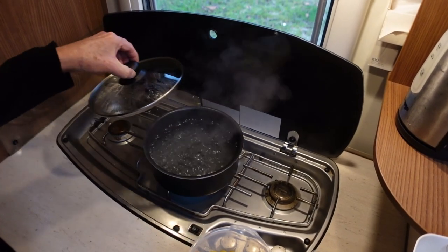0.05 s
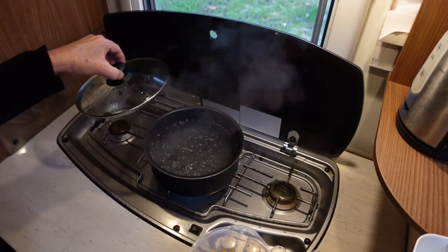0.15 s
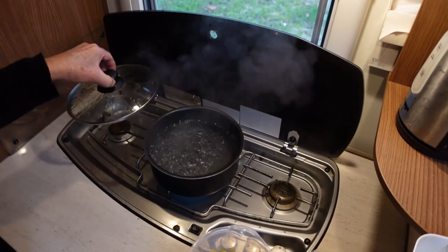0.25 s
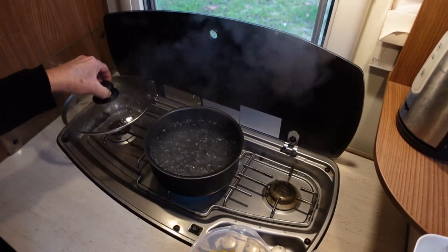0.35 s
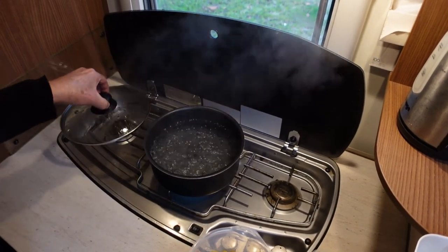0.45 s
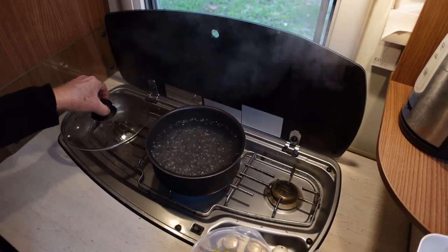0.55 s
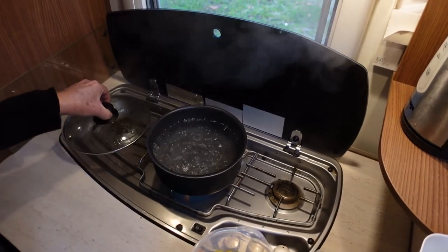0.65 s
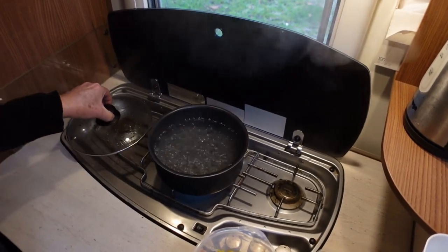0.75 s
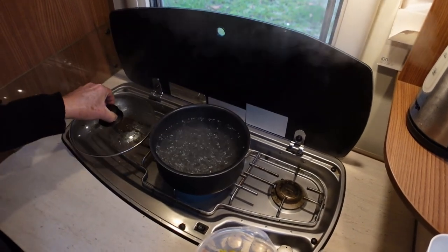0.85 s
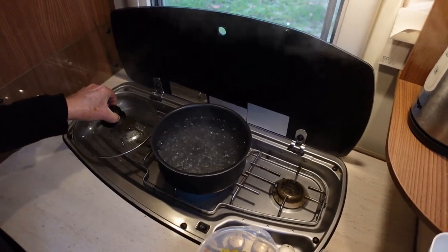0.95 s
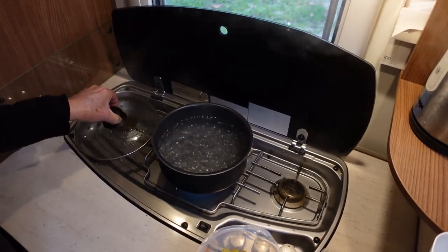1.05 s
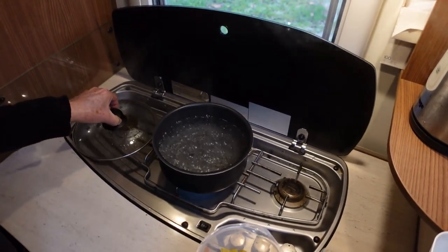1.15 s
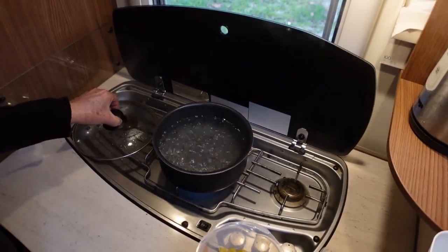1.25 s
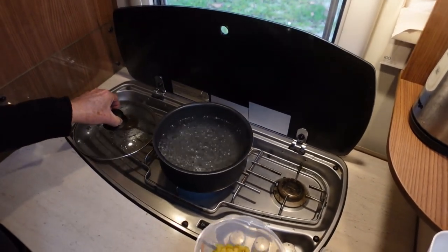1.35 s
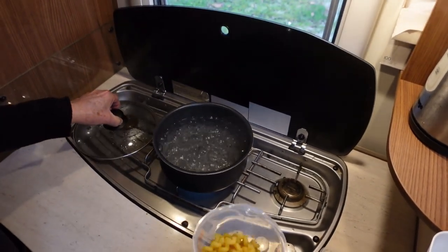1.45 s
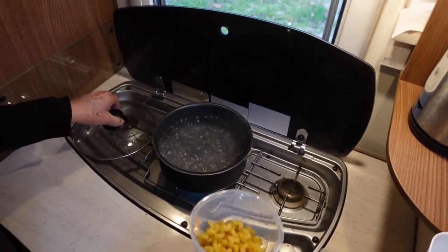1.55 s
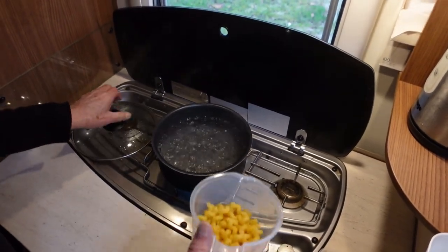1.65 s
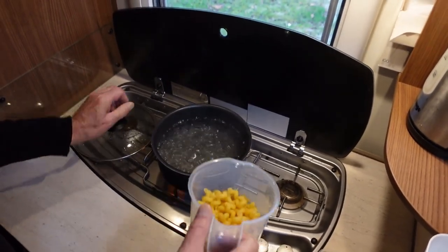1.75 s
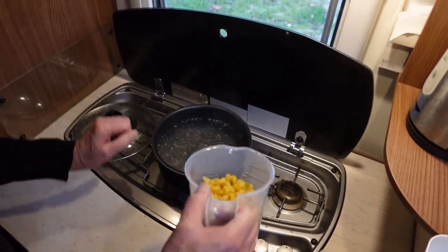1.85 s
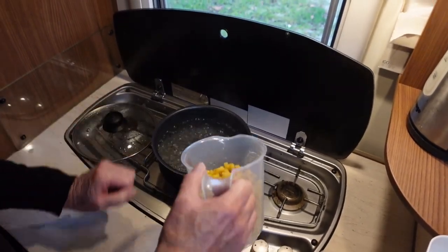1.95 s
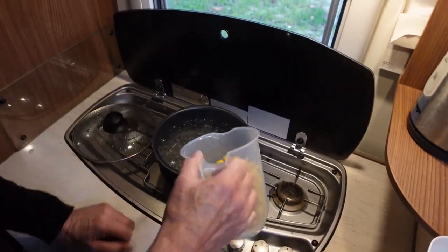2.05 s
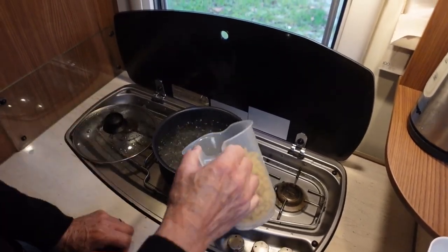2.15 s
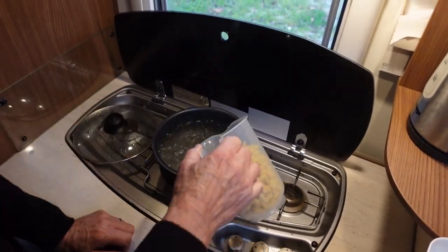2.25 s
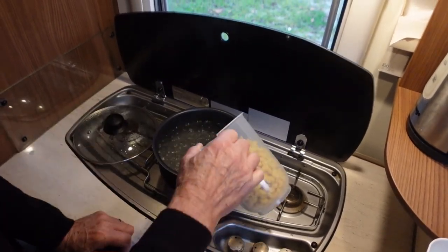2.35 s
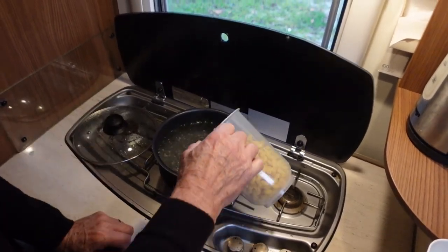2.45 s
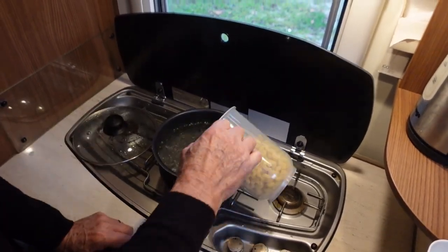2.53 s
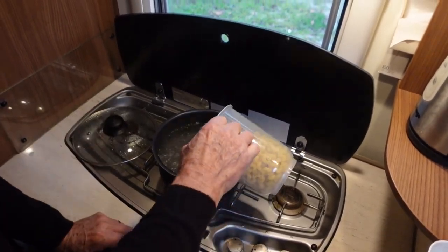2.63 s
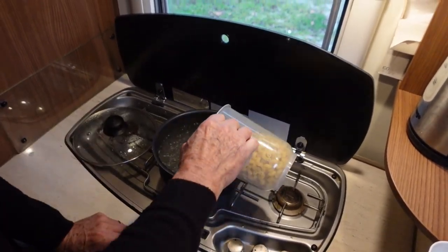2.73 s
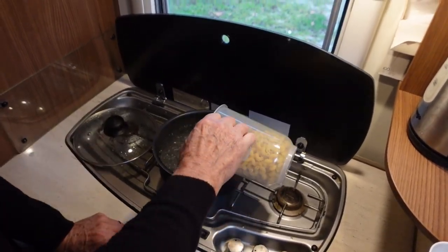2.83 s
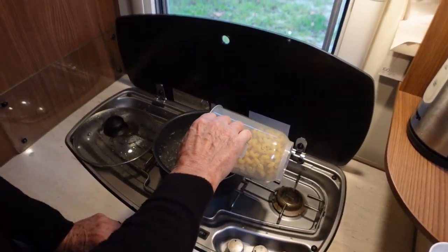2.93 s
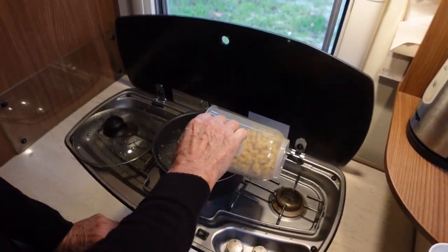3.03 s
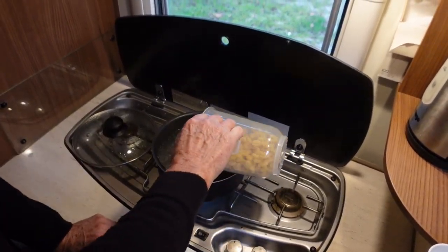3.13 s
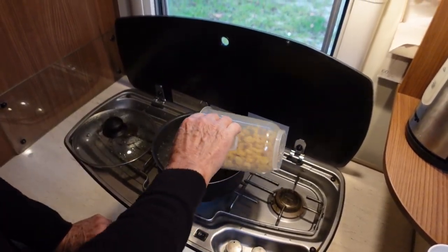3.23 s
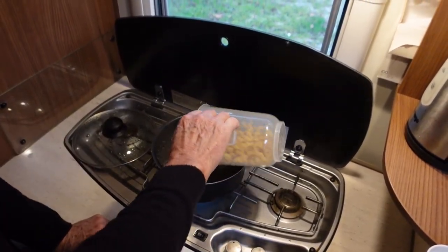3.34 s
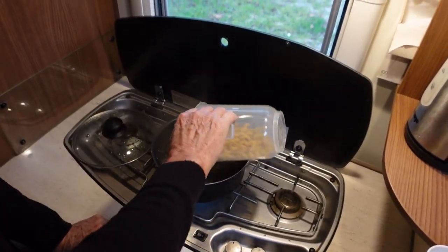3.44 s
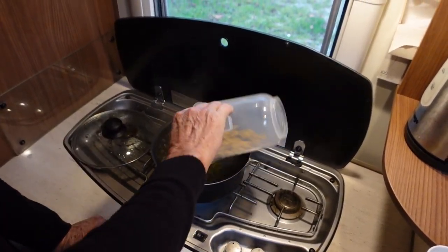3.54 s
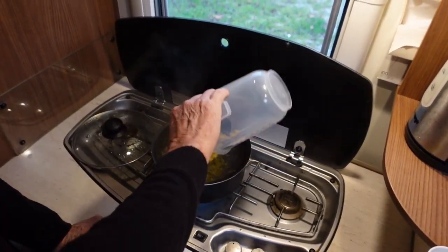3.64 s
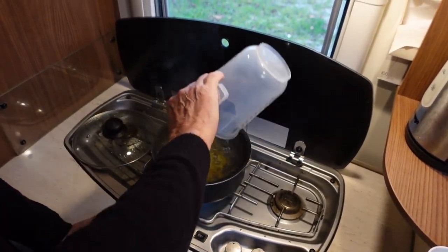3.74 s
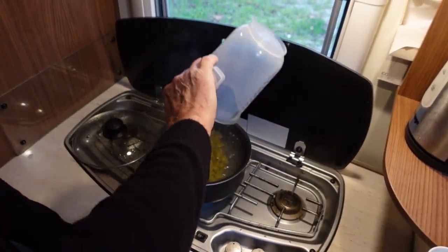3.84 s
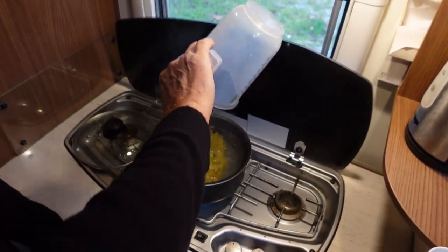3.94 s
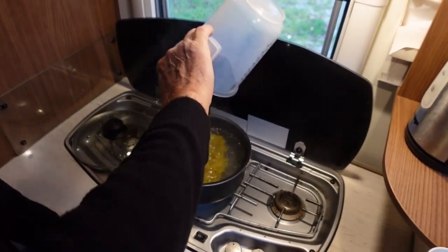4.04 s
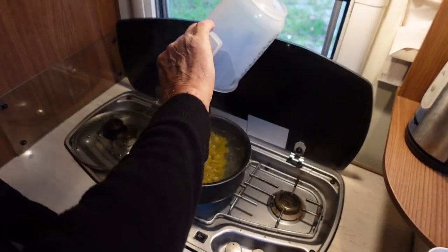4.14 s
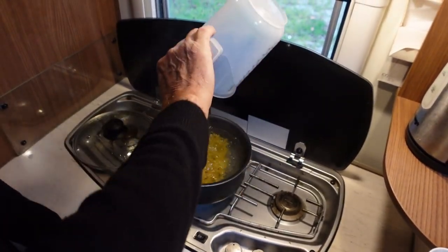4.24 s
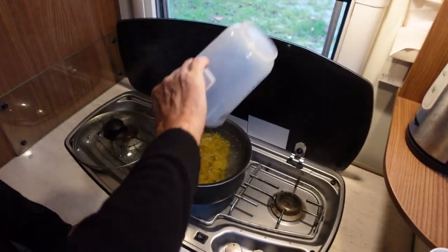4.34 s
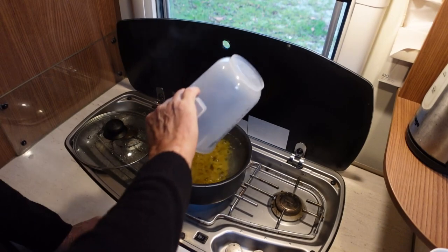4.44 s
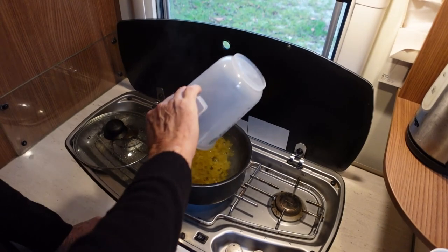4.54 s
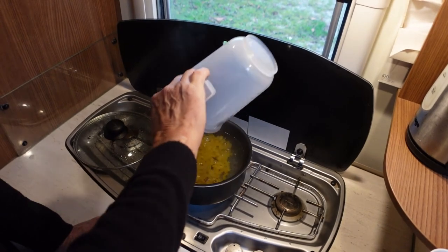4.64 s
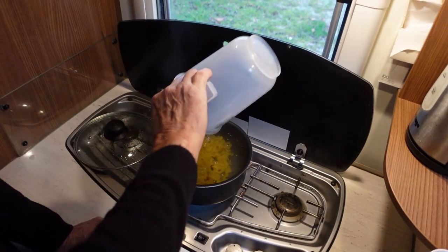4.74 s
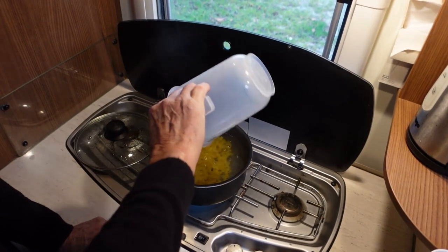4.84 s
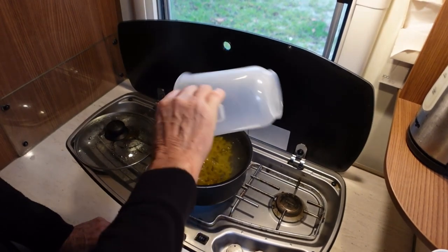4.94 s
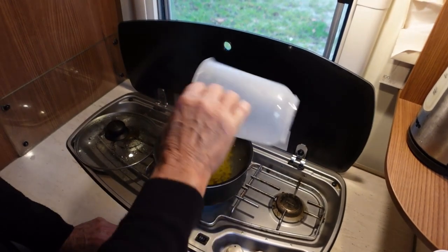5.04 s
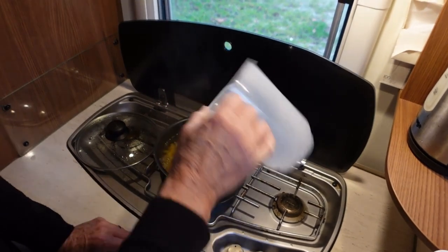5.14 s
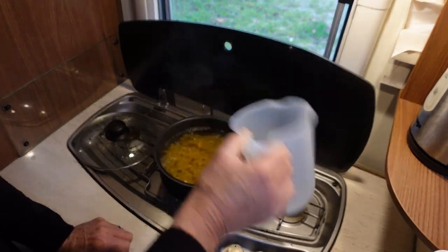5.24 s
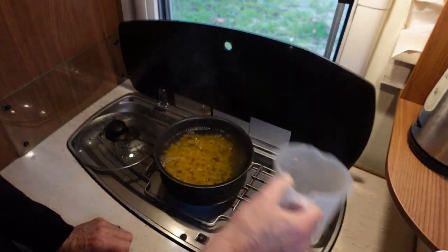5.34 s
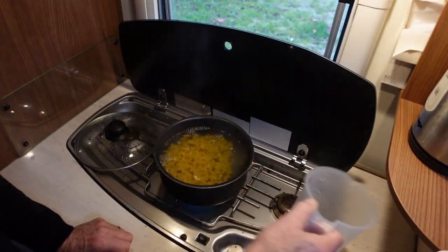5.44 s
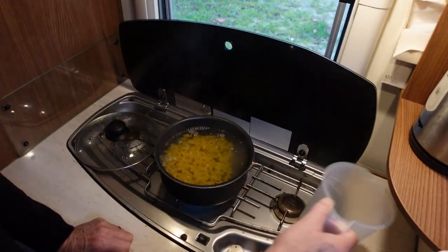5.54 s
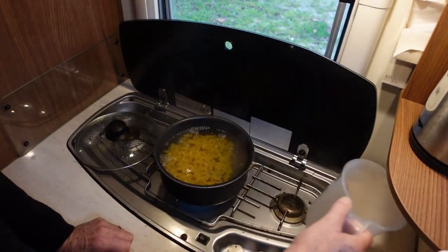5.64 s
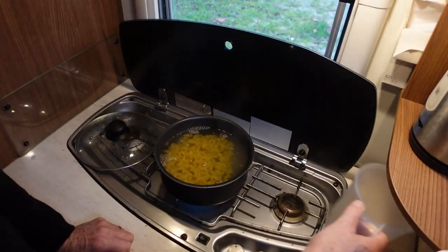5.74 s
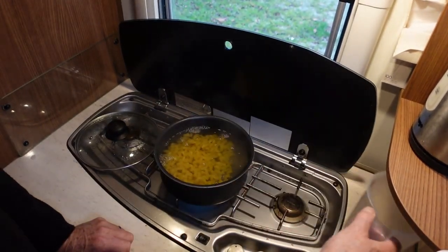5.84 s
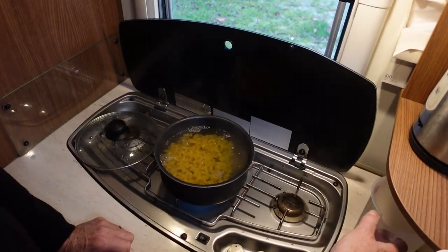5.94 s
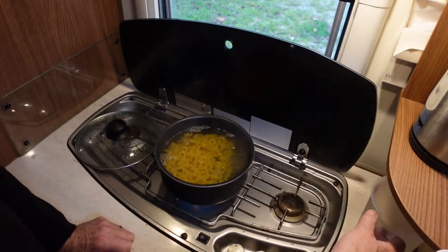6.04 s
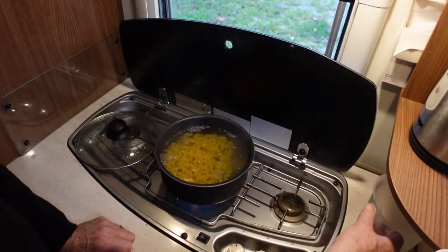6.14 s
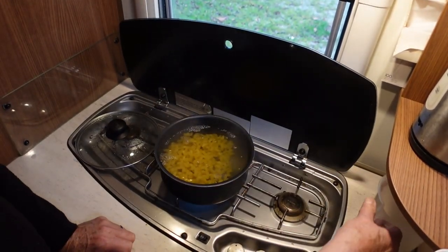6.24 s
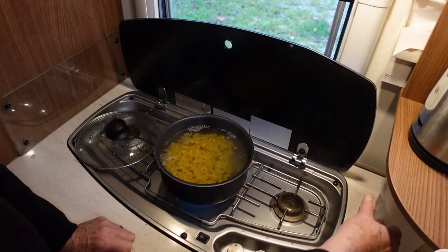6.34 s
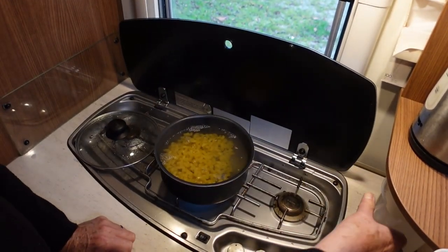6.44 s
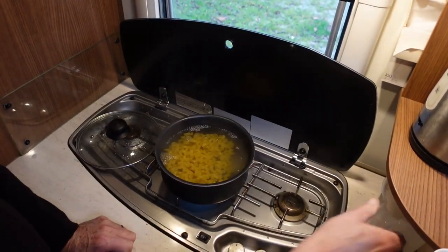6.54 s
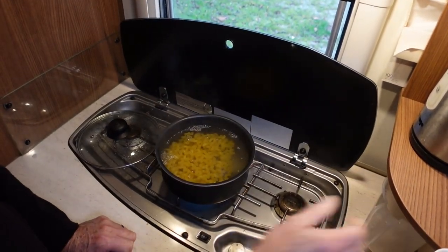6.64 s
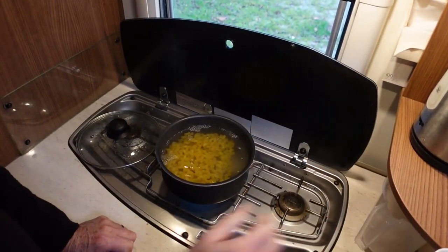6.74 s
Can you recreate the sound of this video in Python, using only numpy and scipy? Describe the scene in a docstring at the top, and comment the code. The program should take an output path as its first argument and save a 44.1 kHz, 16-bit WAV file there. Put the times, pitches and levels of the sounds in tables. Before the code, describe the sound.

Close stereo in a small, fairly dry kitchen: quiet burner hiss and bubbling boil. A glass lid clacks and rocks onto the metal hob. Then hard dry pasta slides in bursts inside a plastic jug, pours in a dense loud rattle into frothing water, and stops abruptly. A few late drops plop, the boil calms, and the jug knocks down on the worktop.

```python
"""Small kitchen, close stereo microphones: a pot boils on a hissing gas hob as a glass lid is set down beside it.
Dry pasta slides in a plastic jug and pours into the water: swarms of ticks colored by the jug wall, and clumps.
The water froths with short bubbles and the boil calms; last pieces and drops plop in as rising sine bubbles.
The jug is put on the worktop. Knocks are noisy clacks over dying modes; flame and boil are shaped noise."""
import sys
import numpy as np
from scipy import signal
from scipy.io import wavfile
from scipy.ndimage import uniform_filter1d

SR = 44100
rng = np.random.default_rng(int(sys.argv[2]) if len(sys.argv) > 2 else 0)


def transcribe(u):
    """Save the signal u as a 16-bit wav file named by the first command-line argument.

    u: samples, shape (n,) or (channels, n), limited to [-1, 1]; the rate is SR.
    q: integer samples, one column per channel.
    """
    v = np.clip(np.atleast_2d(u).T, -1, 1)
    q = np.round(v * 32767).astype(np.int16)
    wavfile.write(sys.argv[1], SR, q)


N = 298998
T = np.arange(N) / SR
HZ = np.fft.rfftfreq(4096, 1 / SR)
HARD_DB = -10.5  # a blow this loud keeps its full treble

# spectrum of dry pasta ticking in the jug: frequency_hz, density_db (per Hz, relative)
PASTA_COLOUR = [(88, -55), (150, -48), (409, -26), (508, -18.5), (1310, -10), (1410, -11), (2130, -3.5),
                (2450, -5.5), (4000, -2.5), (8620, -14.5), (14700, -36.5), (16500, -35)]
# resonances of the jug wall: frequency_hz, width_hz, height_db (counts half, around a common lift)
JUG_WALL = [(1637, 320, -3), (2124, 98, -2), (2720, 64, -2.5), (3770, 390, -6.5), (4190, 140, -7.5),
            (4695, 170, 0.5), (5420, 150, -4.5), (7950, 1100, -6)]


def gain_of(db):
    """Amplitude factor of a level in dB."""
    return 10 ** (np.asarray(db) / 20)


def evened(x):
    """Scale to an RMS of one."""
    return x / np.sqrt(np.mean(x ** 2) + 1e-20)


def read(points, hz):
    """Read a table along a logarithmic frequency axis."""
    f, value = np.transpose(points)
    return np.interp(np.log(hz + 1), np.log(f + 1), value)


def curve(rows, t):
    """Read a table along time, in straight lines between its points."""
    return np.interp(t, *np.transpose(rows))


def add(mix, start_s, sound, pan_db=0):
    """Place a sound in the stereo mix; a positive pan_db leans left."""
    part = mix[:, round(start_s * SR):][:, :len(sound)]
    part += sound[:part.shape[1]] * gain_of([[pan_db / 2], [-pan_db / 2]])


def humps(bands, hz, lift_db):
    """Gain in dB of resonances standing on a spectrum."""
    return sum((lift_db + .5 * db) / (1 + (2 * (hz - f) / width) ** 2) for f, width, db in bands)


def coloured(x, db):
    """Causal minimum-phase filter of unit energy with the given dB at 2049 even frequencies."""
    log_gain = np.log(gain_of(np.maximum(db - db.max(), -100)))
    circle = np.r_[log_gain, log_gain[-2:0:-1]]
    taps = np.fft.ifft(np.exp(circle - 1j * signal.hilbert(circle).imag)).real[:2048]
    return signal.oaconvolve(x, taps / np.linalg.norm(taps))[:len(x)]


def hiss(db_of, patchy_db, flicker_db):
    """Random short-time spectra that drift in patches and flicker as a whole, partly alike in both ears."""
    # likeness of left and right in the background: frequency_hz, likeness (0 to 1)
    likeness = [(60, 0.15), (180, 0.077), (550, 0.59), (1650, 0.88), (4970, 0.87), (15000, 0.9)]
    frames, hz = N // 128 + 5, np.fft.rfftfreq(512, 1 / SR)
    a, b, c, d, patches = rng.standard_normal((frames, 257, 5)).T
    flicker = evened(uniform_filter1d(patches[0], size=3))
    patches = uniform_filter1d(patches, size=6, axis=0)  # across frequency
    patches = evened(uniform_filter1d(patches, size=20, axis=1))  # across time
    same = np.clip(read(likeness, hz), -1, 1)[:, None]
    left = a + 1j * b
    right = same * left + np.sqrt(1 - same ** 2) * (c + 1j * d)
    level_db = db_of(hz)[:, None] + patchy_db * patches + flicker_db * flicker
    spectra = np.array([left, right]) * gain_of(level_db)
    return evened(signal.istft(spectra, nperseg=512, noverlap=384)[1][:, :N])


def grains(per_s, spread_db, lo_hz, hi_hz, cycles, glide, tick, count=24):
    """Random taps, a few large, each ringing briefly at its own pitch after a dry tick."""
    size = gain_of(spread_db * np.minimum(rng.exponential(1, N), 4))
    size = size * (rng.random(N) < per_s / SR) * rng.choice([-1, 1], N)
    kind, t = rng.integers(0, count, N), np.arange(1024) / SR
    out = tick * size
    for k, hz in enumerate(np.geomspace(lo_hz, hi_hz, count)):
        ringing = np.exp(-t * hz / cycles) * np.sin(2 * np.pi * hz * t * (1 + glide * t * hz / cycles))
        out = out + signal.oaconvolve(size * (kind == k), ringing / np.linalg.norm(ringing))[:N]
    return evened(out)


def stream(ticks, db, bright_db):
    """Ticks through a colour, their treble (above about 5 kHz) raised or lowered over time."""
    ticks = coloured(ticks, db)
    dull = signal.lfilter(*signal.butter(2, 5000, fs=SR), ticks)
    return evened(dull + (ticks - dull) * gain_of(bright_db))


def ring(modes, chance, spot_hz, spot_db, t):
    """Dying modes, neighbours swinging in opposite senses; those near the struck spot are driven harder."""
    out = 0
    for k, ((hz, db, t60), luck) in enumerate(zip(modes, chance)):
        drive_db = spot_db / (1 + (np.log(hz / spot_hz) / 0.076) ** 2)
        level_db = db + 2.53 * luck + drive_db - 60 * t / t60
        out = out + (-1) ** k * gain_of(level_db) * np.sin(2 * np.pi * hz * t)
    return out


def flame():
    """Burner hiss and kitchen air: steady noise with whistling bands."""
    # spectrum of burner and air: frequency_hz, density_db (per Hz, relative)
    flame_colour = [(18, -71.5), (30, -48), (101, -0.5), (276, -9.5), (388, -10), (1090, -14.5),
                    (1380, -43), (1890, -12.5), (2670, -19.5), (5590, -22), (7670, -30.5), (15200, -51),
                    (16500, -51)]
    # whistling bands: frequency_hz, width_hz, height_db (counts half, around a common lift)
    whistles = [(1790, 225, -3), (3180, 40, -9.5), (5590, 38, 11), (5940, 52, -2.5), (6810, 130, 10),
                (9500, 48, -10)]
    return gain_of(-52) * hiss(lambda hz: read(flame_colour, hz) + humps(whistles, hz, 16.6), 0.33, 0.55)


def rumble():
    """A low rumble that comes and goes: noise between 75 and 240 Hz."""
    # strength of the rumble: time_s, level_db
    rumble_level = [(.15, -70), (.22, -52.5), (1, -68), (2, -63.5), (2.6, -75), (4.9, -68), (5.46, -68),
                    (5.49, -41), (5.7, -62), (6.78, -61)]
    band = signal.butter(2, [75, 240], "band", fs=SR, output="sos")
    return gain_of(curve(rumble_level, T)) * evened(signal.sosfilt(band, rng.standard_normal(N)))


def boil():
    """Rolling boil: patchy noise through the pot resonances, with small ringing pops."""
    # spectrum of the boil: frequency_hz, density_db (per Hz, relative)
    boil_colour = [(35, -54), (60, -28), (119, -10.5), (224, -3.5), (326, -21), (475, -24), (559, -8),
                   (724, -3), (1400, -7), (1650, -6), (2190, -6), (2640, -10), (6450, -8), (15000, -23),
                   (16500, -7)]
    # pot resonances: frequency_hz, width_hz, height_db (counts half, around a common lift)
    pot = [(730, 68, -4.5), (1415, 140, 11.5), (1780, 93, -12), (2130, 85, 13), (3610, 130, 0),
           (4200, 150, 4), (6560, 180, -11)]
    # strength; flares as the lid drips, is put down by the cold pasta, stirs once more: time_s, level_db
    boil_level = [(0, -47), (.2, -47), (.25, -40.5), (.5, -45), (4.2, -45), (4.7, -51), (6.1, -54),
                  (6.2, -46), (6.4, -50.5), (6.78, -56)]
    roll = hiss(lambda hz: read(boil_colour, hz) + humps(pot, hz, 2.8), patchy_db=1.2, flicker_db=1.67)
    pops = coloured(grains(300, 3.5, 800, 9000, cycles=3., glide=.1, tick=.6), read(boil_colour, HZ))
    return gain_of(curve(boil_level, T)) * (roll + gain_of(-27.0) * pops)


def kitchen(x):
    """Sparse reflections of random sign, each band dying at its own speed."""
    # decay of the small kitchen: frequency_hz, t60_s
    decay = [(100, 0.73), (500, 0.35), (2000, 0.2), (8000, 0.13)]
    taps = np.zeros((2, 20000))
    at = np.arange(120, 19980, 20) + rng.integers(0, 20, (2, 993))
    np.put_along_axis(taps, at, rng.choice([-1., 1.], at.shape), 1)
    taps[1] = 0.6 * taps[0] + 0.93 * taps[1]  # close microphones share much of the echo
    hz, t, z = signal.stft(taps, SR, nperseg=256)
    tail = signal.istft(z * gain_of(-60 * t / read(decay, hz)[:, None]), SR, nperseg=256)[1]
    return signal.fftconvolve(x.mean(0)[None], tail / np.linalg.norm(tail[0]), axes=1)[:, :N]


def knocks(rows, low_modes, high_modes, ring_db, chatter_s, dulling, damping_db_per_s, pan_db):
    """Each blow: a noisy clack, duller when soft, with the stiff part ringing, over the thud of the surface."""
    # spectrum of a hard clack: frequency_hz, density_db (per Hz, relative)
    clack_colour = [(530, -27), (900, -8.5), (1300, -7.5), (3880, -4), (4650, -1), (5590, -3.5),
                    (6010, -0.5), (14400, -18), (15900, -37), (16500, -65)]
    out, t = np.zeros((2, N)), np.arange(16384) / SR
    for (s, clack_db, thud_db, t60, spot_hz), noise in zip(rows, rng.standard_normal((len(rows), 16384))):
        # the surfaces chatter after the first touch
        contact = 0.17 * noise[:4096] * np.exp(-t[:4096] / chatter_s)
        contact[:8] += 2.
        thud = signal.oaconvolve(ring(low_modes, noise, spot_hz, 14.6, t), contact)[:len(t)]
        # the panel takes a moment to swing; the hand damps it
        thud = thud * np.minimum(t / 0.0012, 1) * gain_of(damping_db_per_s * t)
        ping = ring(high_modes, noise[-30:], spot_hz, 0, t)
        # the clack holds while in contact, then dies
        fade = gain_of(clack_db - 60 * np.maximum(t - .005, 0) / t60) * np.minimum(t / 0.00022, 1)
        colour_db = read(clack_colour, HZ) + dulling * (clack_db - HARD_DB) * np.log2(1 + HZ / 2000)
        clack = coloured(fade * noise, colour_db) + gain_of(ring_db) * fade * ping / abs(ping).max()
        add(out, s, clack + gain_of(thud_db) * thud / abs(thud).max(), pan_db)
    return out


def worktop_knocks():
    """The jug set on the worktop: its stiff base rings over the thud of the board."""
    # blows: start_s, clack_db, thud_db (peak), clack_t60_s (after contact), spot_hz (mode nearest the spot)
    blows = [(5.472, -24.5, -30, 0.046, 555), (6.115, -27, -10.5, .022, 498),
             (6.1272, -36.5, -14, 0.19, 644), (6.1494, -40.5, -19.5, 0.061, 412),
             (6.4964, -68, -38.5, .055, 520)]
    # worktop modes: frequency_hz, level_db (before chance and spot), t60_s (before damping by the hand)
    worktop = [(133, -15.5, 0.75), (185, -12, 0.23), (246, 0.5, 0.099), (277, -2.5, 0.68), (335, -0.5, 0.1),
               (412, -5, 0.125), (435, -6, 0.12), (516.6, 2, 0.11), (626, -3, 0.092), (721, -5, 0.17),
               (784, -6, .1), (1090, 3.5, 0.019)]
    # jug base modes: frequency_hz, level_db (before chance), t60_s (before the clack's fade)
    jug_base = [(1685, 2.5, 0.029), (2000, 5, 0.027), (3850, -7, .04), (4650, -17, .05), (5190, -1, .05),
                (5720, -8, .04), (6370, -21, .05)]
    return knocks(blows, worktop, jug_base, ring_db=8.3, chatter_s=0.027, dulling=0.28,
                  damping_db_per_s=-120, pan_db=-1.9)


def hob_knocks():
    """The glass lid rings as it rocks to rest over the thud of the hob; the jug brushes by."""
    # blows: start_s, clack_db, thud_db (peak), clack_t60_s (after contact), spot_hz (mode nearest the spot)
    blows = [(1.1104, -18.5, -14, 0.064, 214), (1.1443, -28.5, -19, .072, 234),
             (1.1954, -33.5, -18.5, 0.23, 216), (1.2244, -35.5, -24.5, 0.26, 480),
             (1.262, -17.5, -14, 0.033, 226), (1.3114, -17, -17, 0.018, 200),
             (1.3244, -18, -15.5, 0.063, 243), (1.3374, -49, -16.5, .036, 184.5),
             (1.4754, -48, -49, .094, 190), (2.1126, -31, -21.5, 0.081, 202)]
    # hob modes: frequency_hz, level_db (before chance and spot), t60_s (before damping by the hand)
    hob = [(106, 0.5, 0.28), (146.7, 4, 0.17), (197.5, 8, 0.12), (237, 6, 0.043), (331.4, 3, 0.21),
           (408, -6, 0.18), (509, 16, 0.046), (602, 0, 0.5), (730, 8.5, 0.14), (1270, 3, 0.086)]
    # glass lid modes: frequency_hz, level_db (before chance), t60_s (before the clack's fade)
    lid = [(1710, -22, 0.038), (2313, -0.5, 0.07), (3460, 2, 0.058), (4600, -6, .07), (5300, -16, .06),
           (6860, -17, 0.053), (8400, -19, 0.053)]
    return knocks(blows, hob, lid, ring_db=0.97, chatter_s=0.071, dulling=0.74,
                  damping_db_per_s=-120, pan_db=0.28)


def froth():
    """Water churned by the falling pasta: a froth of short bubbles, settling after."""
    # strength of the churning: time_s, level_db
    churn = [(2.3, -51), (2.5, -56), (3.05, -36.5), (3.75, -33), (3.82, -29.5), (3.95, -38.5), (4.18, -48),
             (4.28, -80), (4.5, -53), (4.75, -63)]
    churning = (T > churn[0][0]) & (T < churn[-1][0])
    bubbles = grains(450, 2.6, 850, 3400, cycles=6., glide=.03, tick=.05)
    return bubbles * gain_of(curve(churn, T)) * churning


def plops():
    """Single drops and pieces meeting the water: the pitch rises as each bubble shrinks, with a little spray."""
    # drops and pieces: start_s, level_db (before the bubble and spray shares), bubble_hz (at the start)
    drops = [(0.236, -30, 2130), (0.2444, -31, 2340), (0.28, -36, 1410), (0.3544, -34, 6340),
             (3.8022, -25.5, 1480), (3.8661, -20.5, 2180), (3.8753, -21.5, 1270), (3.953, -23, 2720),
             (3.98, -25, 1700), (4.0334, -30, 3150), (4.0853, -35, 3330), (4.141, -43, 2350),
             (4.1775, -37, 1300), (4.198, -29.5, 3450), (4.2214, -37, 1420), (4.233, -17, 3645),
             (4.2824, -37, 1440), (4.491, -37.5, 1230), (4.5254, -22, 3610), (4.552, -40, 3770),
             (4.5623, -33, 1270), (4.598, -35, 1380), (4.617, -24, 2320), (4.641, -37, 1510),
             (5.0973, -36.5, 1970), (5.25, -27.5, 1880), (5.256, -34, 2400), (5.3, -37, 1640),
             (5.3428, -36.5, 3470)]
    out, t = np.zeros((2, N)), np.arange(4096) / SR
    for (s, db, hz), noise in zip(drops, rng.standard_normal((len(drops), 4096))):
        t60 = 0.061 * (2000 / hz) ** 0.37  # seconds; smaller, higher bubbles die sooner
        bubble = np.sin(2 * np.pi * hz * t * (1 + 3.22 * t)) * np.minimum(t / 0.00012, 1)
        spray = coloured(noise, humps([(hz, 1.6 * hz, 0)], HZ, 36.5))
        add(out, s, gain_of(db - 60 * t / t60) * (0.49 * bubble + 0.36 * spray))
    return out


def wall_colour():
    """Spectrum in dB of hard pieces heard through the jug wall."""
    return read(PASTA_COLOUR, HZ) + humps(JUG_WALL, HZ, 4.9)


def sliding_pasta():
    """Hard pieces tick on each other and ring the wall as the jug tips."""
    # rattle of the slide, before surges: time_s, level_db
    flow = [(2.24, -50), (2.3, -33.5), (2.4, -27), (2.46, -20), (2.59, -19), (2.69, -33), (2.75, -23.5),
            (2.83, -30.5), (3.03, -19), (3.12, -24), (3.3, -16.5)]
    start_s, end_s = flow[0][0], flow[-1][0]
    level = gain_of(curve(flow, T)) * (T > start_s) * (T < end_s)
    # the top pieces click brightly, the packed mass behind them is duller
    bright_db = 3 - 9 * np.clip(T - start_s, 0, end_s - start_s)
    ticks = grains(1400, 2.6, 882, 14840, cycles=16.5, glide=0, tick=1.77)
    return level * stream(ticks, wall_colour(), bright_db)


def pouring_pasta():
    """The stream over the spout swells, peaks, thins and stops; gives a middle and a sideways part."""
    # spectrum of the rush over the spout: frequency_hz, density_db (per Hz, relative)
    rush_colour = [(47, -58), (80, -58), (218, -21.5), (341, -34), (426, -20), (595, -19), (869, -12),
                   (2590, -7.5), (3620, -1), (3960, -3.5), (9040, -2.5), (10800, -17), (15100, -19.5),
                   (16500, -49)]
    start_s, swell_s, peak_s, end_s = 3.02, 0.14, 3.469, 3.76
    arch_db = -10 - 18.5 * abs(T - peak_s)
    onset_db = -17 * np.clip(1 - (T - start_s) / swell_s, 0, 1)
    stop_db = -420 * np.maximum(T - end_s, 0)
    level = (T > start_s) * gain_of(arch_db + onset_db + stop_db)
    bright_db = -6 + 13 * (np.clip(T, start_s, end_s) - peak_s)  # brightens as the jug empties
    colour_db = read(rush_colour, HZ) + humps(JUG_WALL, HZ, 6.7)
    return [level * stream(grains(4500, 2.56, 704.4, 14900, cycles=9.7, glide=0, tick=1.8), colour_db, bright_db)
            for part in range(2)]


def clumps():
    """Clumps of pasta slip against the wall: noise bursts with a few hard ticks, ringing it at one main pitch."""
    # slips: start_s, level_db (before the burst's own noise), pitch_hz, t60_s
    slips = [(2.2577, -18.5, 3980, 0.084), (2.2793, -11.5, 4000, 0.035), (2.3152, -11.5, 3740, 0.086),
             (2.3434, -11, 4100, 0.057), (2.367, -10.5, 3850, 0.06), (2.3735, -7.5, 3900, 0.036),
             (2.3864, -15.5, 2130, 0.097), (2.4064, -9.5, 3850, 0.069), (2.4399, -4.5, 2240, .093),
             (2.4634, -10, 2180, .06), (2.4872, -4, 2140, 0.039), (2.5018, -6, 4740, 0.08),
             (2.5239, -11, 4660, 0.15), (2.5474, -9, 2240, .1), (2.557, -4.5, 4100, 0.061),
             (2.5733, -2, 4500, 0.024), (2.604, -9, 4070, 0.085), (2.637, -6, 4970, 0.09),
             (2.6668, -9, 2130, .038), (2.6756, -8.5, 4100, 0.054), (2.7205, -7, 2060, .041),
             (2.7931, -4.5, 1980, 0.076), (2.8023, -2.5, 3700, .038), (2.8355, -5.5, 3350, 0.13),
             (2.87, -3.5, 3730, 0.036), (2.9099, -12.5, 3220, 0.12), (2.981, -6, 3670, .031),
             (3.129, -12.5, 4720, 0.21), (3.2778, -5, 3600, 0.066), (3.379, -2.5, 3630, 0.097),
             (3.5028, -13, 4460, 0.084), (3.5823, -9, 3660, 0.05), (3.7636, -14, 3630, 0.026),
             (3.8184, -17, 2800, 0.052), (3.8906, -18.5, 3400, 0.035)]
    out, t = np.zeros((2, N)), np.arange(4096) / SR
    wall_db = wall_colour()
    for (s, db, hz, t60), noise in zip(slips, rng.standard_normal((len(slips), 2, 4096))):
        burst = noise[0] * (.5 + 1.4 * (noise[1] > 1.8))  # a few hard ticks stand out
        burst = burst * gain_of(-60 * t / t60) * np.minimum(t / 0.0027, 1)
        # higher clumps carry more treble, and so do harder ones
        treble_db = -2 + 2.5 * np.log2(hz / 4000) + .5 * (db - HARD_DB)
        shelf_db = treble_db / (1 + (6000 / (HZ + 1)) ** 4)
        burst = coloured(burst, wall_db + humps([(hz, 260, 0)], HZ, 8.0) + shelf_db)
        add(out, s, gain_of(db) * burst)
    return out


def pasta():
    """Slide and pour surge at random together, pieces scatter left and right, and clumps land in bursts."""
    slide = sliding_pasta()
    rush, aside = pouring_pasta()
    surges = uniform_filter1d(rng.standard_normal(N), size=500)
    surges = evened(uniform_filter1d(surges, size=500))
    middle = (slide + rush) * gain_of(1.4 * surges)
    scatter = gain_of(-20.5) * np.outer([1, -1], aside)
    return middle + scatter + clumps()


def scene():
    """Close sounds with their kitchen echo, over the stove and the rumble."""
    background = flame() + rumble() + boil()
    near = worktop_knocks() + hob_knocks() + froth() + plops() + pasta()
    balanced = near * gain_of([[-.2], [.2]])  # leans slightly right
    return background + gain_of(-11.5) * kitchen(near) + balanced


def record(dry):
    """Close microphones hear the bass alike; soft overload on peaks; the bass cut and the band limit."""
    mid, side = dry.mean(0), (dry[0] - dry[1]) / 2
    side = signal.sosfilt(signal.butter(2, [400, 11000], "band", fs=SR, output="sos"), side)
    soft = 0.83 * np.tanh(np.array([mid + side, mid - side]) / 0.99)
    cut = signal.sosfilt(signal.butter(3, 95, "high", fs=SR, output="sos"), soft)
    band_limit = signal.firwin(511, 16000, window=("kaiser", 9), fs=SR)
    return signal.oaconvolve(cut, band_limit[None], "same", axes=1)


dry = scene()
out = record(dry)
transcribe(out)
```